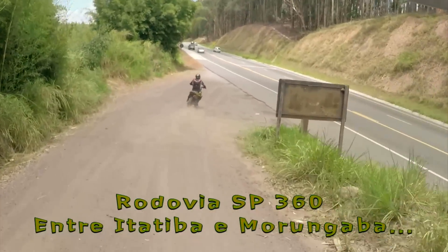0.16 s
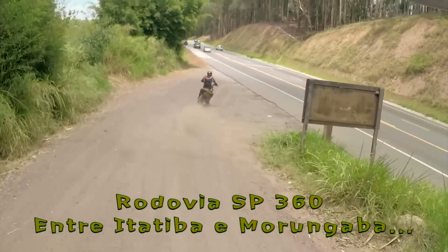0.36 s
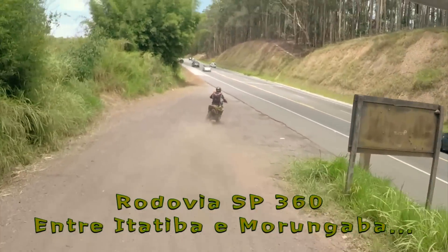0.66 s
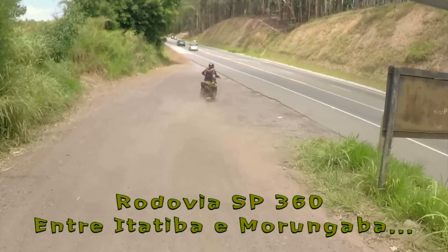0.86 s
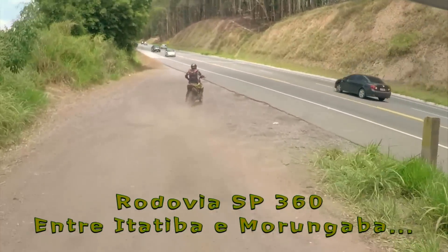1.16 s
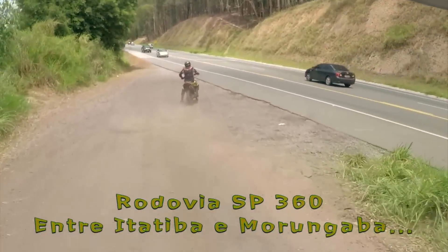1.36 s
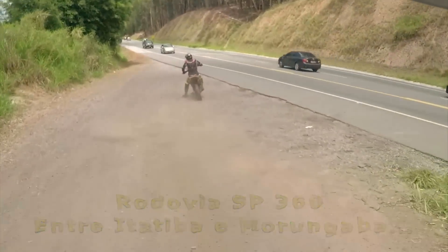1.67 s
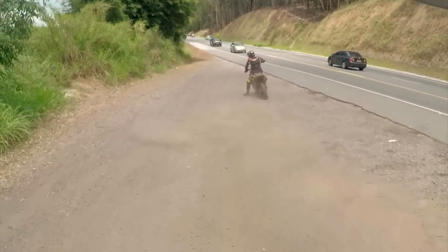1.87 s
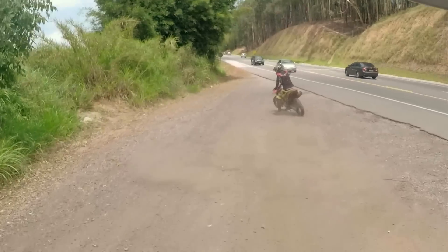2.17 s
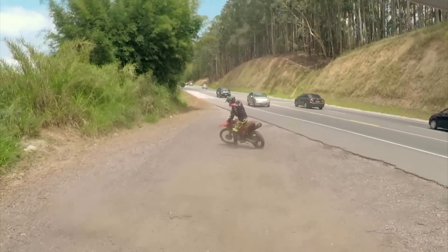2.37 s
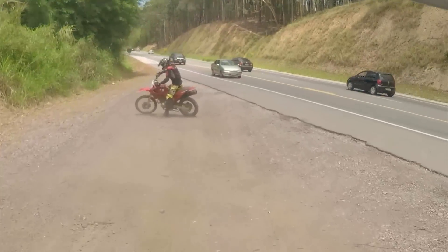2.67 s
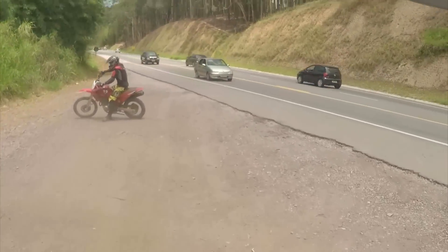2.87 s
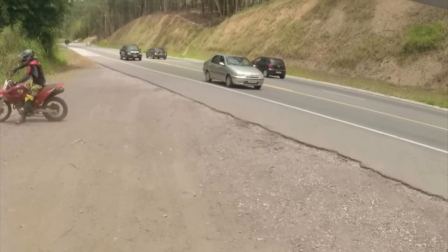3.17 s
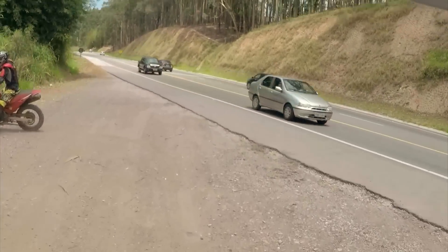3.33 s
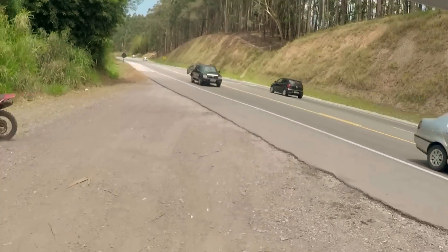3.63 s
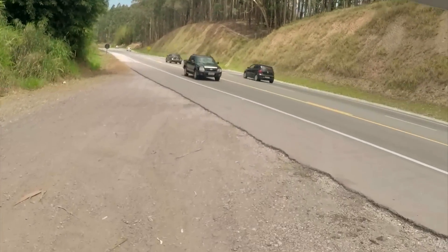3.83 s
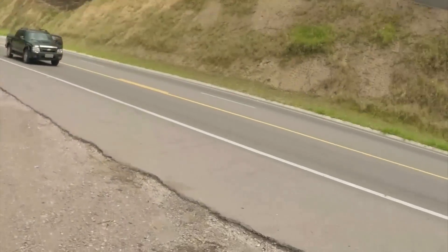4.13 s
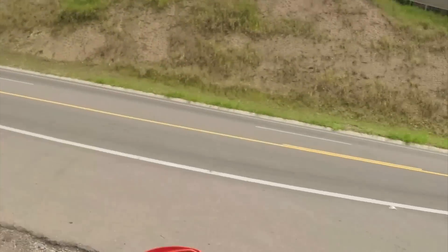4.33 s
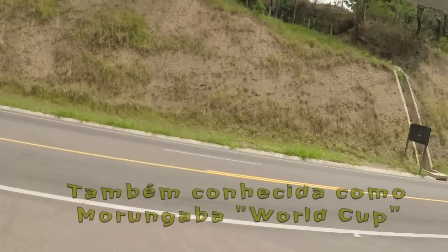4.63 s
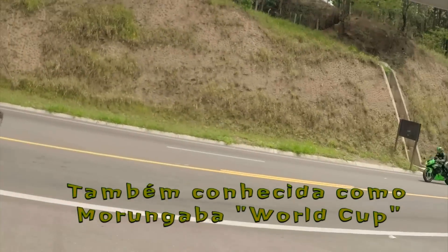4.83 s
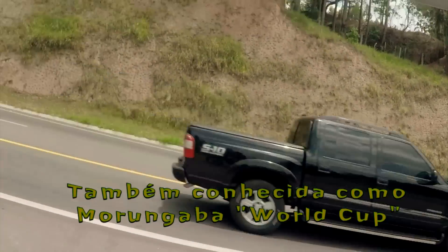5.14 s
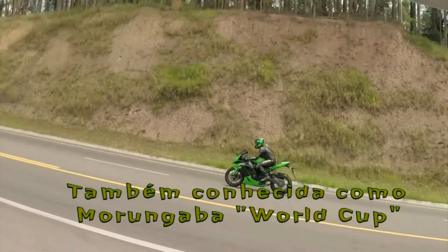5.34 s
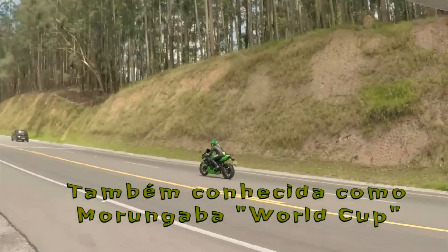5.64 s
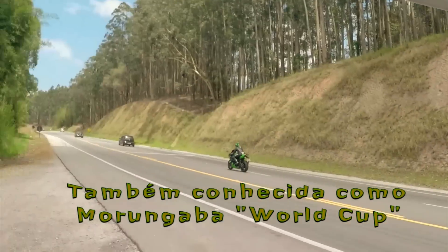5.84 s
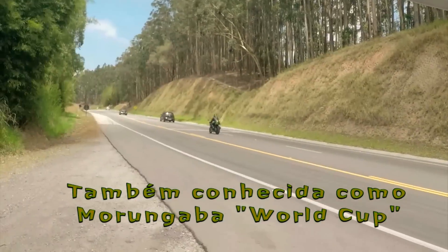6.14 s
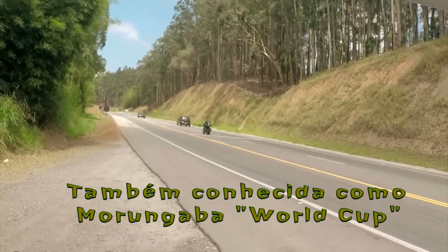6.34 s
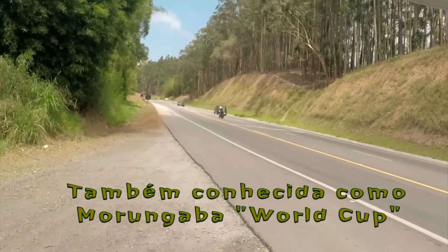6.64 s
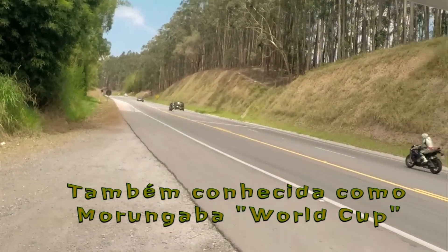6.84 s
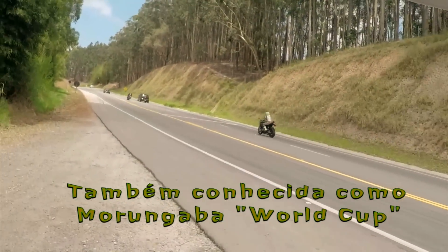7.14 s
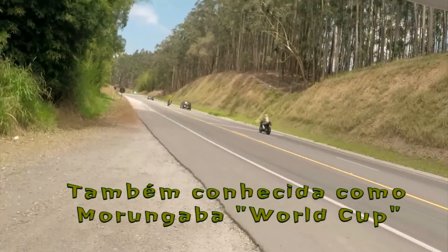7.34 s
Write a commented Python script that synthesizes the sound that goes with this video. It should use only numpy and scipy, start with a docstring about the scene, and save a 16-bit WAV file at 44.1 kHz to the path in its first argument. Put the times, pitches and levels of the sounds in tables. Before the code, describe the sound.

At a roadside, a motorcycle engine idles nearby with an even thudding, under faint gravel spray and tiny brake squeaks. Loud knocks on the microphone and low wind gusts interrupt, and the level ducks for a moment. After one more dull bump, the idle quickens slightly and cars rush by on the asphalt. A sports bike sings and growls past, whining into the distance, and a softer one follows off the throttle.

```python
"""A single-cylinder motorcycle thuds at idle close by while two sports bikes pass, one after the other.
Each idle firing rings the silencer; the four-cylinder bikes sing, growl and rasp at their firing rate.
Car tyres roar on the highway, a light wind buffets the microphone, a dirt bike spits gravel and squeaks.
Four knocks on the camera overload the microphone; its gain control ducks the scene after the hard ones."""
import sys
import numpy as np
from scipy import signal
from scipy.fft import rfft, irfft
from scipy.io import wavfile
from scipy.ndimage import uniform_filter1d

SR = 44100
rng = np.random.default_rng(int(sys.argv[2]) if len(sys.argv) > 2 else 0)


def to_wav(s):
    """Save 16-bit WAV."""
    ch = np.atleast_2d(s).T  # columns
    pcm = np.round(np.clip(ch, -1, 1) * 32767)  # PCM
    wavfile.write(sys.argv[1], SR, pcm.astype(np.int16))


N = 330750
T = np.arange(N) / SR


def idling_engine(rest_db=-29, rest_hz=15.33, db_per_doubling=5.5, uneven_db=1.3, valves_db=-52):
    """Each firing swells and dies in the silencer; the valves rustle three times a cycle."""
    # Engine speed. Each row: time in seconds, firing rate in Hz.
    firing_rate = [(0.0, 15.68), (0.7, 15.84), (1.0, 15.18), (1.8, 15.74), (2.7, 16.24), (3.5, 15.84),
                   (3.85, 15.72), (4.1, 19.03), (4.4, 19.82), (4.7, 17.64), (4.95, 19.31), (5.6, 16.48),
                   (6.3, 16.47), (6.9, 16.0), (7.5, 15.8)]
    # Silencer modes. Each row: frequency in Hz, level in dB, rise time in seconds.
    silencer_modes = [(69.6, 5.5, .021), (119.4, -4.5, 0.014), (183, -1, 0.005), (264.6, 0, 0.0076),
                      (324, -17.5, 0.014), (515, -18, 0.01), (563.6, -18, 0.019)]
    # Valve gear modes. Each row: frequency in Hz, nominal width in Hz, level in dB.
    valve_modes = [(1365, 140, 1.5), (2590, 270, 3.5), (4220, 270, -9), (6600, 400, -6)]
    rate_hz = curve(firing_rate)
    cycles = np.cumsum(rate_hz) / SR - .66
    firings_s, t = firing_times(cycles), T[:SR // 6]
    shared_scatter = rng.standard_normal(len(firings_s))
    thud = np.zeros(N)
    for hz, db, rise_s in silencer_modes:
        envelope = amp(db) * (t / rise_s) ** 2 * np.exp(2 - 2 * t / rise_s)
        scatter = (shared_scatter + rng.standard_normal(len(firings_s))) / np.sqrt(2)
        pulses = clicks(firings_s, amp(uneven_db * scatter))
        thud += signal.oaconvolve(pulses, envelope * np.sin(2 * np.pi * hz * t))[:N]
    taps = rng.standard_normal(N) * np.exp(-2 * (3 * cycles % 1))
    valve_ring = ring([(hz, db, 5.2 / width_hz) for hz, width_hz, db in valve_modes])
    valves = signal.oaconvolve(taps, valve_ring)[:N]
    level_db = rest_db + db_per_doubling * np.log2(rate_hz / rest_hz)
    return amp(level_db) * unit_rms(thud) + amp(valves_db) * unit_rms(valves)


def sports_bikes(hidden_at_s=5.22, hidden_half_s=.071):
    """The leader slips behind a car, flares and whines from afar; the follower is off the throttle."""
    # Firing rates as heard, pitch drop included. Each row: time in seconds, rate in Hz.
    leader_pitch = [(3.4, 299), (3.9, 311), (4.4, 332), (4.97, 346), (5.2, 341), (5.34, 336), (5.5, 323.5),
                    (5.68, 320.3), (5.95, 319.6), (6.3, 324), (6.8, 330), (7.5, 336)]
    follower_pitch = [(6.1, 285), (6.4, 276), (6.72, 262), (6.9, 260), (7.1, 256), (7.5, 251)]
    # Each row: closest time and passing time in seconds, then note, growl, hiss, rasp and howl in dB.
    rides = [(5.45, .4, -22.5, -26.5, -35.5, -35, -46), (6.85, 0.41, -37.5, -40, -50, -45.5, -51)]
    # Exhaust growls and the far whine. Each row: multiple of the firing rate, level in dB.
    leader_pipe = [(1.5, -17), (1.75, -13), (2, -3.5), (2.5, -14), (3, -16.5), (3.5, -17.5), (4, -12.5),
                   (4.5, -22), (5.5, -17.5)]
    follower_pipe = [(2, -1.5), (4, -15), (5, -17)]
    whine_orders = [(3, 0), (4, -3)]
    # Leader's swells. Each row: centre in seconds, level in dB (flares: re steady rasp), width in seconds.
    rasp_flares = [(5.95, 6.5, 0.048), (6.31, 5.5, 0.14), (6.6, 2.5, .06)]
    whine_swells = [(7.13, -42.5, .3)]
    hidden = np.exp(-abs((T - hidden_at_s) / hidden_half_s) ** 3)
    cycles = firing_count(leader_pitch)
    leader = sports_bike(cycles, leader_pitch[0][0], rides[0], leader_pipe, hidden, swells(rasp_flares))
    follower = sports_bike(firing_count(follower_pitch), follower_pitch[0][0], rides[1], follower_pipe)
    whine = swells(whine_swells) * orders(cycles, whine_orders, waver_db=.5)
    return leader + whine + follower


def sports_bike(cycles, emerge_s, ride, pipe, hidden=0, flare=0, fade_in_s=.98, bounce_s=.001088):
    """A firing note, the pipe's growl, rasp and gas hiss, and the airbox howl, each carrying its own way."""
    # Gas leaving the pipe. Each row: frequency in Hz, density in dB.
    jet_spectrum = [(1000, -11), (2800, 9), (3150, -12), (3400, 8), (4200, -1), (5200, -8), (7000, -1),
                    (9500, -15.5), (12500, -17), (14500, -18.5)]
    # Airbox howl. Each row: multiple of the firing rate, level in dB.
    howl_orders = [(3, -10), (4, -5), (5, -5), (5.25, -3)]
    closest_s, passing_s, note_db, growl_db, hiss_db, rasp_db, howl_db = ride

    def gain(db, falloff, rear_db):
        return amp(db) * pass_gain(closest_s, passing_s, falloff, rear_db)

    rasp = gain(rasp_db, falloff=1.26, rear_db=6.16) * exhaust_rasp(cycles) * (1 + flare)
    pulsing = 1 + .37 * np.cos(np.pi * cycles)  # the hiss pulses at every second firing
    hiss = gain(hiss_db, falloff=1.6, rear_db=1) * unit_rms(noise(jet_spectrum) * pulsing)
    rush = rasp + hiss
    lag_s = bounce_s / np.hypot(1, (T - closest_s) / passing_s)  # asphalt bounce: a sweeping comb
    rush = (rush + .17 * np.interp(T - lag_s, T, rush)) * amp(2 * drift(19))
    note = gain(note_db, falloff=1.45, rear_db=.48) * orders(cycles, [(1, 0)], waver_db=3)
    growl = gain(growl_db, falloff=1.95, rear_db=1.7) * orders(cycles, pipe, waver_db=3.5)
    howl = gain(howl_db, falloff=2, rear_db=-14) * orders(cycles, howl_orders, waver_db=3)
    fade_in = np.clip((T - emerge_s) / fade_in_s + .5, 0, 1)
    return fade_in * (amp(-7.3 * hidden) * note + amp(-11.6 * hidden) * (growl + rush) + howl)


def exhaust_rasp(cycles, scatter=.16, turbulence_db=-9):
    """Four unequal cylinders bark through turbulent gas, with one clean overtone on top."""
    # Relative strength of each cylinder.
    cylinders = [1, .12, .55, .08]
    # Each row: frequency in Hz, gain in dB.
    rasp_spectrum = [(300, -22), (500, -43), (800, -0.5), (1300, 0), (1800, 6.5), (2200, -3), (2500, 3.5),
                     (2780, 7.5), (3100, -9), (3400, -2), (4800, -12.5), (7000, -15.5), (10000, -39),
                     (15000, -41)]
    # Each row: multiple of the firing rate, level in dB.
    scream_orders = [(10.5, -11.5)]
    firings_s = firing_times(cycles)
    sizes = np.resize(cylinders, len(firings_s)) * (1 + scatter * rng.standard_normal(len(firings_s)))
    turbulence = amp(turbulence_db) * unit_rms(np.diff(rng.standard_normal(N + 1)))
    bark = colour(unit_rms(clicks(firings_s, sizes)) + turbulence, rasp_spectrum)
    return roadside_echoes(bark) + orders(cycles, scream_orders, waver_db=3)


def roadside_echoes(x, echoes_per_s=2000, t60_s=.09):
    """Asphalt and an earth bank scatter short echoes, so gliding overtones swell and fade."""
    t = T[:SR // 4]
    taps = rng.choice([-1., 1.], len(t)) * (rng.random(len(t)) < echoes_per_s / SR)
    taps *= amp(-60 * t / t60_s)
    return unit_rms(x + signal.oaconvolve(x, taps / np.linalg.norm(taps))[:N])


def knocks(mount_lag_s=.00652):
    """Blows crack in the housing and shake the mount, which scrapes once; hard ones buzz a loose part."""
    # Each row: start in seconds, crack peak in dB, its low and high edges in Hz, thump peak in dB.
    blows = [(1.9813, 18, 156, 4000, 5), (2.4969, 12.5, 540, 1860, 5), (2.7972, 7, 307, 1410, -5.5),
             (4.522, -6.5, 476, 1790, 6.5)]
    # Each row: frequency in Hz, level in dB, t60 in seconds.
    housing_modes = [(383, 3.5, 0.037), (630, 0.5, 0.032), (770, 11, 0.014), (1102, 10, 0.0091),
                     (1655, 1.5, 0.021), (2360, 9, 0.01), (3510, 4.5, 0.0094), (5700, -32, 0.0022)]
    mount_modes = [(77.5, -1, 0.23), (116.5, 0.5, 0.054), (168.6, -4, 0.079), (245, -42, 0.011)]
    # Each row: start (buzz) or centre (scrape) in seconds, level in dB, length in seconds.
    buzzes = [(1.983, -25.5, 0.093), (2.502, -28.5, 0.079)]
    scrapes = [(2.021, -5, 0.014)]
    # Each row: frequency in Hz, density in dB.
    buzz_spectrum = [(300, 5), (700, 2), (1400, 1), (1800, -4), (2350, 3.5), (3200, -22), (4600, -25),
                     (5080, -13), (5400, -24), (6600, -27), (7300, -39), (15000, -44)]
    scrape_spectrum = [(200, 8.5), (400, 10.5), (800, 5), (1400, 1.5), (1800, -19), (2400, -12),
                       (3200, -31), (5000, -30), (8000, -55), (15000, -64)]
    mix, housing, mount = np.zeros(N), ring(housing_modes), ring(mount_modes)
    for start_s, crack_db, low_hz, high_hz, thump_db in blows:
        band = signal.butter(2, [low_hz, high_hz], "band", fs=SR, output="sos")
        crack = signal.sosfilt(band, housing)
        add(mix, start_s, -amp(crack_db) * crack / abs(crack).max())
        add(mix, start_s + mount_lag_s, amp(thump_db) * mount / abs(mount).max())
    for start_s, db, length_s in buzzes:
        fade = signal.windows.tukey(int(length_s * SR), .4)
        add(mix, start_s, amp(db) * fade * noise(buzz_spectrum)[:len(fade)])
    return mix + swells(scrapes) * noise(scrape_spectrum)


def highway(wash_db=-43, bounce=.24, lag_s_per_gain=.02):
    """Tyres roar and tread sings over a steady wash, with brief patches of high sizzle."""
    # Each row: closest time in seconds, level in dB, passing time in seconds.
    cars = [(4.3, -38, 0.33), (5.03, -36.5, 0.26), (5.65, -33.5, 0.38), (6.35, -36, 0.26), (7.05, -39, 1)]
    # Each row: centre in seconds, level in dB, width in seconds.
    tread_swells = [(4.15, -40.5, 0.39)]
    sizzle_patches = [(3.82, -61.5, 0.18), (4.25, -59, 0.4), (5.08, -53.5, 0.13)]
    # Each row: frequency in Hz, density in dB.
    tyre_spectrum = [(200, -5), (400, -1.5), (600, -7.5), (1000, 1.5), (1350, 3.5), (1800, 0), (2700, -3.5),
                     (3200, -10), (4200, -8.5), (5000, -21), (7200, -25), (9000, -32), (10600, -25.5),
                     (15000, -44)]
    tread_spectrum = [(400, -48), (535, -10), (562, -7), (590, -5), (760, -52)]
    sizzle_spectrum = [(3000, -25), (7000, -6), (10500, 5), (13000, -7), (15000, -11)]
    wash_spectrum = [(100, 7), (400, -4.5), (800, -1), (1300, -1.5), (1800, -7), (2700, -9), (3300, -12),
                     (4100, -17), (5000, -22), (7500, -25.5), (9200, -27.5), (10600, -27.5), (12000, -32),
                     (15000, -36)]
    roar = noise(tyre_spectrum)
    gain = np.sqrt(sum((amp(db) * pass_gain(closest_s, passing_s, falloff=1.27, rear_db=.3)) ** 2
                       for closest_s, db, passing_s in cars))
    reflection = np.interp(T - lag_s_per_gain * gain, T, roar)  # off the asphalt: later as a car nears
    tread = swells(tread_swells) * noise(tread_spectrum)
    sizzle = swells(sizzle_patches) * colour(grains(per_s=5000, spread_db=3.5), sizzle_spectrum)
    wash = amp(wash_db) * noise(wash_spectrum)
    tyres = gain * amp(.5 * drift(23)) * unit_rms(roar + bounce * reflection)
    return tyres + tread + sizzle + wash


def wind(swing_db=3, swing_hz=5.8):
    """A restless breeze and a few gusts buffet the microphone."""
    # Each row: frequency in Hz, density in dB.
    buffet_spectrum = [(8, -13), (18, 4.5), (27, 8), (36, -4), (50, -3), (90, -15), (200, -39), (600, -86)]
    # Each row: time in seconds, level in dB.
    breeze_levels = [(0, -19), (.7, -27), (1.35, -23), (2.8, -27.5), (3.7, -28.5), (4.2, -22.5),
                     (5.3, -24.5), (6.1, -32.5), (7.5, -30)]
    # Each row: centre in seconds, level in dB, width in seconds.
    gusts = [(2.13, -8.5, 0.059), (2.3, -7, 0.12), (2.55, -11.5, 0.081), (2.92, -13, 0.052),
             (4.39, -21.5, .05), (5.14, -23, .04), (5.26, -16.5, 0.031), (7.45, -11.5, 0.055)]
    buffet = noise(buffet_spectrum)
    buffet /= np.sqrt(uniform_filter1d(buffet ** 2, SR // 8) + .21)  # partly evens out its level
    breeze = amp(curve(breeze_levels) + swing_db * drift(swing_hz))
    return (breeze + swells(gusts)) * buffet


def dirt_bike(squeak_half_s=.005, fall_hz_per_s=20000):
    """Tyres spit small stones as it rides off; braking gives short falling squeaks."""
    # Each row: centre in seconds, level in dB, width in seconds.
    sprays = [(.1, -43, 0.15), (.2, -40, 0.015), (.3, -49.5, 0.17), (.945, -41, 0.036), (1.36, -41, 0.02),
              (1.58, -48.5, 0.39), (2.8, -46.5, 0.31)]
    # Each row: frequency in Hz, density in dB.
    gravel_spectrum = [(1200, -30), (2200, 5.5), (2800, 7), (3500, 0), (4500, -7.5), (6000, -15),
                       (9000, -22), (15000, -33)]
    # Each row: centre in seconds, peak in dB, pitch in Hz.
    squeaks = [(0.064, -35.5, 3000), (.346, -34.5, 2680), (.415, -35, 2570), (1.577, -32.5, 2880),
               (1.622, -39, 2760)]
    chirps = np.zeros(N)
    for centre_s, db, hz in squeaks:
        t = T - centre_s
        cycles = hz * T - fall_hz_per_s * t ** 2 / 2
        chirps += amp(db) * np.exp(-(t / squeak_half_s) ** 2) * np.sin(2 * np.pi * cycles)
    gravel = swells(sprays) * colour(grains(per_s=4000, spread_db=2), gravel_spectrum)
    return gravel + chirps * (1 + .5 * drift(300))


def pass_gain(closest_s, passing_s, falloff, rear_db):
    """Gain of a source on a straight road; in passing_s it covers its closest distance to us."""
    along = (T - closest_s) / passing_s
    distance = np.hypot(1, along)
    return amp(rear_db * along / distance) / distance ** falloff


def firing_count(pitch, wander=.0014):
    """Running count of firings, with a slight wander in rate."""
    return np.cumsum(curve(pitch) * (1 + wander * drift(20))) / SR


def firing_times(cycles):
    """Seconds at which the count passes a whole number."""
    return np.interp(np.arange(np.ceil(cycles[0]), cycles[-1]), cycles, T)


def orders(cycles, rows, waver_db):
    """Clean multiples of the firing rate, each wavering in the moving air."""
    return np.sqrt(2) * sum(amp(db + waver_db * drift(5.1)) * np.sin(2 * np.pi * multiple * cycles)
                            for multiple, db in rows)


def ring(modes):
    """Decaying modes of a struck body."""
    t = T[:SR // 3]
    return sum(amp(db - 60 * t / t60_s) * np.sin(2 * np.pi * hz * t) for hz, db, t60_s in modes)


def clicks(times_s, sizes):
    """Impulses, each split between its two nearest samples."""
    index, fraction = np.divmod(times_s * SR, 1)
    index = index.astype(int)
    before = np.bincount(index, sizes * (1 - fraction), N + 1)
    after = np.bincount(index + 1, sizes * fraction, N + 1)
    return before[:N] + after[:N]


def grains(per_s, spread_db):
    """Sparse clicks of very unequal size."""
    sparse = rng.standard_normal(N) * (rng.random(N) < per_s / SR)
    return sparse * amp(spread_db * np.minimum(rng.exponential(1, N), 4))


def colour(x, spectrum):
    """Filter x by a spectrum; rms 1."""
    hz, db = np.transpose(spectrum)
    bins_hz = np.fft.rfftfreq(N, 1 / SR)
    gain = amp(np.interp(np.log(bins_hz + 1), np.log(hz), db))
    return unit_rms(irfft(rfft(x) * gain, N))


def noise(spectrum):
    return colour(rng.standard_normal(N), spectrum)


def drift(cutoff_hz):
    """Low-passed random motion; rms 1."""
    bins_hz = np.fft.rfftfreq(N, 1 / SR)
    return unit_rms(irfft(rfft(rng.standard_normal(N)) / (1 + (bins_hz / cutoff_hz) ** 4), N))


def swells(rows):
    """Sum of bell-shaped envelopes."""
    return sum(amp(db) * np.exp(-2 * ((T - centre_s) / width_s) ** 2) for centre_s, db, width_s in rows)


def curve(rows):
    return np.interp(T, *np.transpose(rows))


def add(mix, start_s, sound):
    part = mix[round(start_s * SR):][:len(sound)]
    part += sound[:len(part)]


def amp(db):
    return 10 ** (np.asarray(db) / 20)


def unit_rms(x):
    return x / np.sqrt(np.mean(x ** 2) + 1e-20)


def scene():
    """All sources on one channel."""
    return (idling_engine() + sports_bikes() + highway() + wind() + dirt_bike() + knocks())[None]


def record(dry, threshold_db=7.5, recovery_db_per_s=8.5, attack_s=.038, knee=5, cutoff_hz=15450):
    """Gain control dives after a peak and creeps back; the peak itself saturates; then a low-pass."""
    level_db = 20 * np.log10(abs(dry[0]) + 1e-9)
    recovery_db = recovery_db_per_s * T
    held_db = np.maximum.accumulate(level_db + recovery_db) - recovery_db
    over_db = np.maximum(held_db - threshold_db, 0)
    pole = np.exp(-1 / (attack_s * SR))
    ducked = dry / amp(signal.lfilter([1 - pole], [1, -pole], over_db))
    clipped = .95 * ducked / (1 + abs(ducked) ** knee) ** (1 / knee)
    low_pass = signal.firwin(511, cutoff_hz, window=("kaiser", 9), fs=SR)
    return signal.oaconvolve(clipped, low_pass[None], "same")


dry = scene()
out = record(dry)
to_wav(out)
```